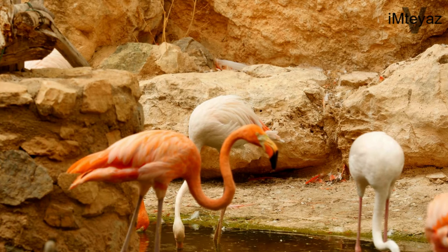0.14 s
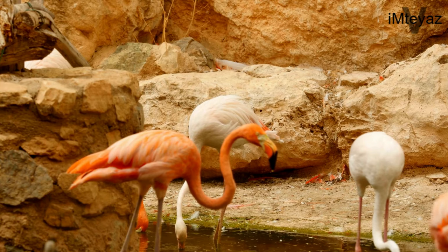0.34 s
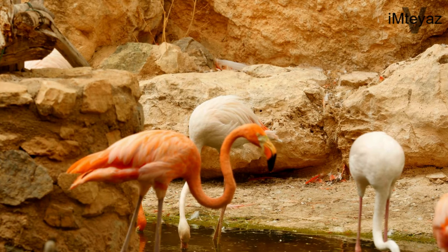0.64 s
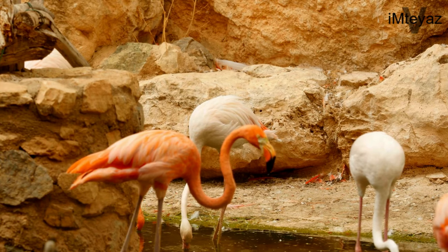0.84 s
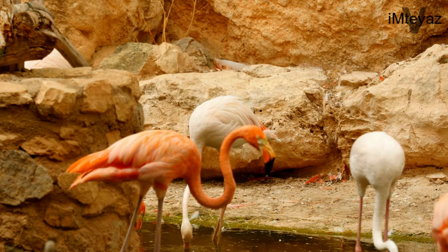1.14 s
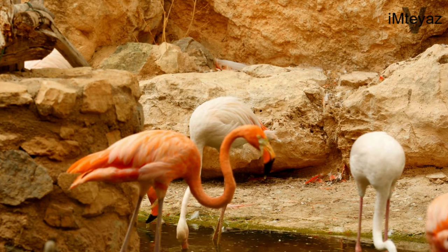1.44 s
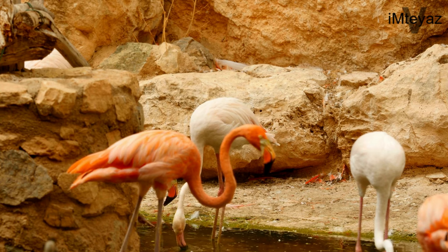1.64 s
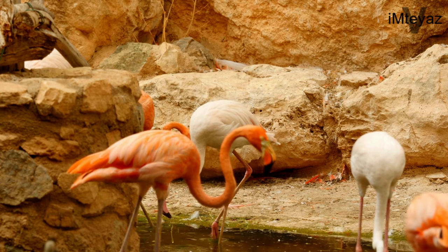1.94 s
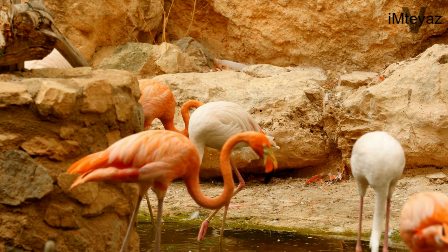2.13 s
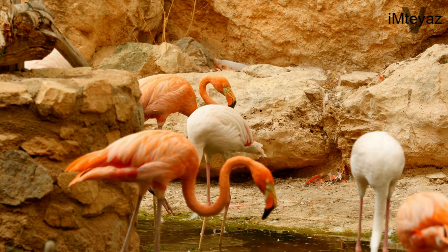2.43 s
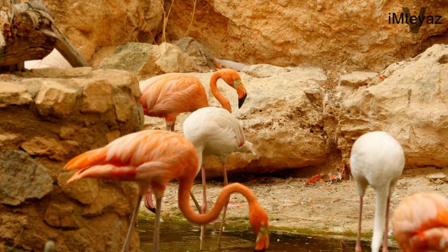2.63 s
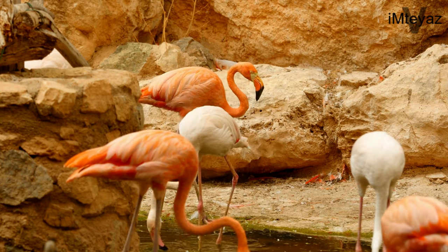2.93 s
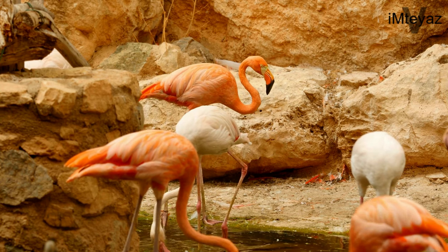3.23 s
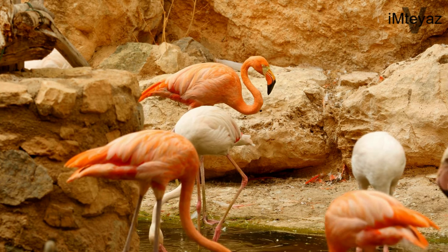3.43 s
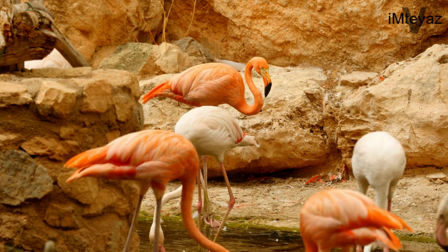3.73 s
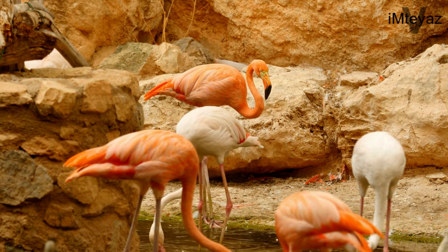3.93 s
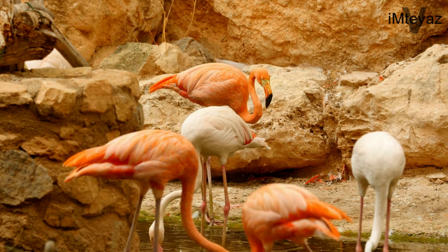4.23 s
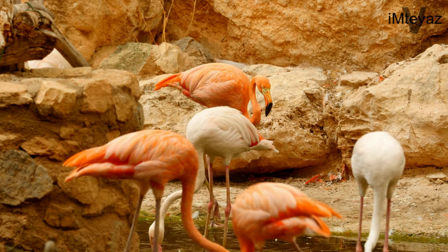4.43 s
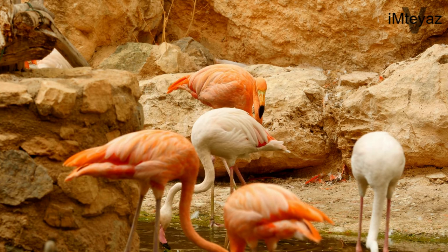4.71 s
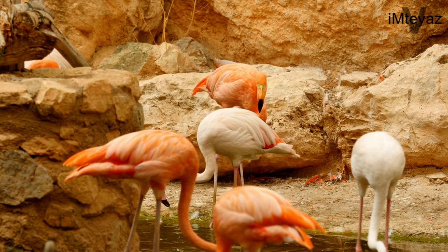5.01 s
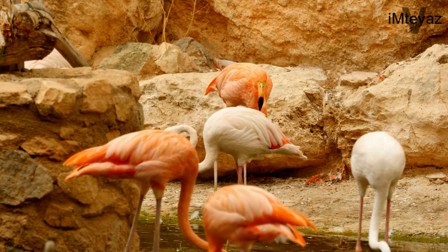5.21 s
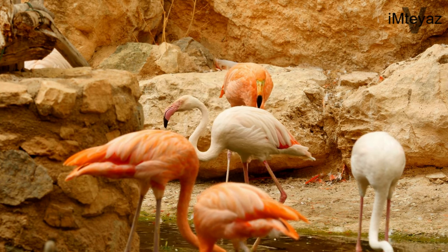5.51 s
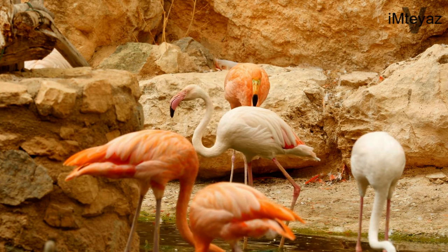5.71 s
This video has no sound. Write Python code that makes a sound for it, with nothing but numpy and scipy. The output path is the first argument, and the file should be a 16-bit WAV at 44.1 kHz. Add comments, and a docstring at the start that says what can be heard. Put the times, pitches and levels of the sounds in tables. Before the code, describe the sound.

Outdoors in a rocky pool enclosure, a stereo microphone hears open air, a faint steady whine above 5 kHz and a far flock gabbling, most active in the first 0.8 seconds. A weak honk at the left opens the scene; at about 0.4 seconds a thin, raspy squeak on the left sags in pitch. A clearer honk follows at 0.85, then from 1.16 a close flamingo, now central, honks every quarter second or so: tiny, nasal, buzzing bursts with sharp edges, each echoing briefly from the rocks. Soft low grunts answer on the right between 2.1 and 3.0. After a longer gap, a lower, cleaner honk lands at 3.8; from 4.1 to the end the honks are rougher, and from about 4.35 hissier. Faint small-bird chirps whistle near 3.5, 4.5, 4.8 and 5.6, while low rumble swells unevenly, strongest around 2.5 and 4.8.

```python
"""A flamingo honks about four times a second close to the microphone, in a rock-walled zoo pool.
Two syrinx membranes pulse at different pitches into windpipe resonances, so its short calls rasp.
Resonant pulse trains also grunt to the right; a noise rasp and a falling tone squeak to the left.
Gliding sines chirp as a small bird; shaped noise gives the far flock, open air, low rumble and
thin high whine. Filtered-noise tails and discrete reflections return the calls from the rocks."""
import sys
import numpy as np
from scipy import signal
from scipy.fft import rfft, irfft
from scipy.io import wavfile
from scipy.ndimage import uniform_filter1d, map_coordinates

SR = 44100
rng = np.random.default_rng(int(sys.argv[2]) if len(sys.argv) > 2 else 0)


def digitize_waveform(pressure):
    """Quantize a signal to 16-bit integers and store it at the path in sys.argv[1].

    Rows of a 2-D input are taken as channels; values are limited to [-1, 1].
    """
    field = np.atleast_2d(pressure).T
    bounded = np.clip(field, -1, 1)
    quanta = np.round(bounded * 32767).astype(np.int16)
    wavfile.write(sys.argv[1], SR, quanta)


N = 258426
TIME = np.arange(N) / SR

# honks of the near bird: start_s, gain_db, pitch_hz, rise_s, roughness (0-1), beak_opening (0-1)
HONKS = [ (.049, -24.5, 721.6, 0.0029, 0.31, 0.061), (0.849, -15.7, 660, 0.0046, .22, .35),
         (1.163, -14.2, 741, .0065, .55, 0.24), (1.4383, -14.6, 700, .004, .5, .15),
         (1.705, -14.5, 691.6, 0.0045, 0.46, 0.043), (1.9621, -14.6, 682.4, .005, 0.79, .5),
         (2.2333, -16, 660.5, 0.0086, 0.72, .8), (2.5027, -16, 703, 0.01, 0.64, 0.52),
         (2.779, -18.5, 692, 0.011, 0.53, 0.27), (3.058, -16.5, 693, 0.0076, 0.68, 0.47),
         (3.3552, -18.5, 692, 0.0073, 0.59, .35), (3.8245, -16, 462, 0.0033, 0.16, 0.65),
         (4.079, -16, 692, 0.0076, .8, 0.5), (4.3517, -15, 679, 0.0042, 0.79, 0.5),
         (4.628, -16.5, 689, .005, 0.85, 0.24), (4.916, -17.5, 671.4, 0.0021, 0.83, 0.74),
         (5.1759, -16.5, 677.4, 0.0017, 0.84, 0.84), (5.453, -17, 658, .0035, 0.8, 0.35),
         (5.7288, -17, 659, 0.0046, 0.83, 0.67)]
# reverberant bands of the enclosure: centre_hz, level_db, t60_s
RING_BANDS = [(500, -7.5, 0.97), (1200, -19.5, 0.39), (2170, -12, 0.73), (4470, -11, 0.52),
              (7500, -5.5, 0.28), (13500, -38, 0.12)]


def undb(db):
    """Decibels to amplitude ratio: 20 dB for each factor of ten."""
    return 10 ** (np.asarray(db) / 20)


def unit(x):
    """Normalisation by root mean square, so that levels can be set in decibels."""
    return x / np.sqrt(np.mean(x ** 2) + 1e-18)


def pan(x, left_minus_right_db):
    """Intensity stereo: the level difference between the channels places a sound."""
    gains = undb(np.array([[left_minus_right_db], [-left_minus_right_db]]) / 2)
    return x * unit(gains)


def add(out, x, start_s):
    """Superposition: the pressures of x and out sum from start_s on."""
    i = int(start_s * SR)
    out[:, i:i + x.shape[1]] += x[:, :N - i]


def resonate(x, hz, width_hz):
    """A steep-sided band-pass resonance with its output at rms 1."""
    low = np.sqrt(hz ** 2 + width_hz ** 2 / 4) - width_hz / 2
    high = min(low + width_hz, SR / 2 - 100)
    band = signal.butter(2, [low, high], "band", fs=SR, output="sos")
    return unit(signal.sosfilt(band, x))


def body(x, modes):
    """Parallel modes: one source excites every resonance, and their sum is scaled to rms 1."""
    return unit(sum(undb(db) * resonate(x, hz, width_hz) for hz, width_hz, db in modes))


def colour(x, points):
    """Spectral weighting by (hz, db) points, interpolated along log frequency."""
    hz, db = np.transpose(points)
    f = np.fft.rfftfreq(x.shape[-1], 1 / SR) + 1  # the added 1 Hz avoids log(0)
    gain = undb(np.interp(np.log(f), np.log(hz), db))
    return irfft(rfft(x) * gain, x.shape[-1])


def walk(rate_hz):
    """Slow random fluctuation: held random steps, smoothed by a moving average, at rms 1."""
    k = int(SR / rate_hz)
    steps = np.repeat(rng.standard_normal(N // k + 1), k)
    return unit(uniform_filter1d(steps, k)[:N])


def wide_noise(side_db, size=N):
    """Mid-side stereo: independent sum and difference noises, side_db being side over mid."""
    mid, side = rng.standard_normal((2, size))
    return unit(mid + undb(side_db) * side * np.array([[1], [-1]]))


def surround_noise():
    """Diffuse-field noise: the channels are alike in the bass and differ more in the middle."""
    # stereo width of air and rumble: band_hz, side_minus_mid_db
    side_spectrum = [(60, -12), (140, -10), (280, -6.5), (520, -1), (1500, 2.5), (5300, -8.5), (12000, 4.5)]
    mid, side = rng.standard_normal((2, N))
    width = colour(side, side_spectrum) * np.array([[1], [-1]])
    # the total power of mid and side is levelled in each band
    levelling = [(hz, -10 * np.log10(1 + undb(db) ** 2)) for hz, db in side_spectrum]
    return colour(mid + width, levelling)


def effort(t, held_s, rise_s=0.0043, swell_db_per_s=800, fall_db_per_s=750):
    """Exponential growth and decay: straight ramps in decibels around a steady hold."""
    rising_db = swell_db_per_s * np.maximum(rise_s - t, 0)
    falling_db = fall_db_per_s * np.maximum(t - held_s, 0)
    return undb(-rising_db - falling_db)


def membrane(hz, jitter, shimmer_db):
    """Pulse excitation: each membrane closure is a sharp pulse, irregular in time and size."""
    n, at, out = np.arange(len(hz)), 4., np.zeros(len(hz))
    for late, size in rng.standard_normal((100, 2)):
        if at >= len(hz):
            break
        # a band-limited pulse may fall between samples
        out += undb(shimmer_db * size) * np.sinc(n - at) * (abs(n - at) < 8)
        at += SR / hz[int(at)] * np.exp(jitter * late)
    return out


def background(air_db=-40, whine_hz=5376, whine_width_hz=560, whine_db=-52.5):
    """Filtered noise: open air, an unevenly growing rumble and a narrow whine like far insects."""
    # relative spectrum of the open air: band_hz, density_db
    air_spectrum = [(18, -61), (30, -34), (131, -4), (245, 1), (336, 2.5), (760, -4), (1160, -3),
                    (1630, -9), (2230, -8), (3490, -12.5), (4780, -13.5), (5310, 0), (6380, -20),
                    (14800, -35.5), (16000, -50)]
    # course of the rumble, before 0.5 dB of gain and its flutter: time_s, level_db
    rumble_course = [(0, -74), (.55, -49.5), (1.7, -51), (2.55, -38.5), (3.65, -45), (4.8, -36),
                     (5.86, -39.5)]
    # resonances of the rumble: centre_hz, width_hz, level_db
    rumble_modes = [(167.8, 54, -7.5), (242.5, 27, -1.5), (295, 65, 1), (398, 73, -2.5), (762, 250, -5.5)]
    air = undb(air_db + .5 * walk(4.14)) * unit(colour(surround_noise(), air_spectrum))
    rumble_db = np.interp(TIME, *np.transpose(rumble_course)) + 0.5
    rumble_flutter_db = 2.0 * walk(15)
    rumble = undb(rumble_db + rumble_flutter_db) * body(surround_noise(), rumble_modes)
    whine = undb(whine_db) * resonate(wide_noise(-13), whine_hz, whine_width_hz)
    return air + rumble + whine


def flock(murmur_db=-44.5, swell_db_per_s=650, fade_db_per_s=77, flutter_db=2.5):
    """Incoherent addition: the powers of far calls and a steady gabble sum in a fluttering wash."""
    # calls of the far flock: peak_s, peak_db (before flutter)
    far_calls = [(.15, -32), (.37, -29.5), (.44, -28.5), (.6, -30.5), (.72, -34.5), (1.33, -37),
                 (2.12, -32), (2.62, -36), (2.92, -36.5), (3.58, -41), (3.92, -42)]
    # resonances of the flock: centre_hz, width_hz, level_db
    far_throat = [(1229, 390, 7.5), (2410, 640, 3.5), (3380, 300, -2), (4200, 1400, 0.5)]
    power = undb(murmur_db) ** 2
    for peak_s, db in far_calls:
        call = undb(db) * effort(TIME - peak_s, 0, 0, swell_db_per_s, fade_db_per_s)
        power = power + call ** 2
    flutter = undb(flutter_db * walk(35))
    return np.sqrt(power) * flutter * body(wide_noise(1.5), far_throat)


def split(x, hz):
    """Band splitting: overlapping linear weights give each reverberant band its share of x."""
    centres = np.transpose(RING_BANDS)[0]
    f = np.fft.rfftfreq(x.shape[-1], 1 / SR)
    return irfft(rfft(x) * np.interp(f, centres, centres == hz), x.shape[-1])


def enclosure(x, build_s=0.015, side_db=-4, scatter_db=-13, scatter_s=0.0033):
    """Convolution with a room response: near scatter, distinct reflections and a diffuse tail."""
    # reflections off ground and rocks: delay_s, level_db, left_minus_right_db
    reflections = [(.0042, -19, 20), (0.0129, -12.5, 0), (0.0198, -21.5, 28), (.029, -23.5, -25)]
    t = np.arange(SR) / SR
    noise = wide_noise(side_db, size=SR)
    # close scatter arrives from the sides and widens the call
    early = np.exp(-t / scatter_s)
    response = undb(scatter_db) * wide_noise(1.3, size=SR) * early / np.linalg.norm(early)
    # the highest bands of the tail die first
    for hz, db, t60_s in RING_BANDS:
        fade = undb(-60 * t / t60_s) * (1 - np.exp(-t / build_s))
        response += undb(db) * split(noise, hz) * fade / np.linalg.norm(fade)
    for delay_s, db, side in reflections:
        response[:, int(delay_s * SR)] += pan(undb(db), side)[:, 0]
    return signal.fftconvolve(x.mean(axis=0)[None], response, axes=1)[:, :N]


def small_bird(length_s=0.064, fall=0.04, waver=.012):
    """Frequency modulation: thin whistles are single sines that fall slightly and waver."""
    # chirps of a small, distant bird: start_s, peak_db, starting_pitch_hz (before waver)
    chirps = [(3.5, -47, 3880), (3.75, -60, 4220), (4.53, -42, 3960), (4.805, -45, 4240), (5.61, -48, 3950),
              (5.661, -42, 3980)]
    out, u = np.zeros((2, N)), np.linspace(0, 1, int(length_s * SR))
    for start_s, db, hz in chirps:
        pitch = hz * (1 - fall * u + waver * walk(200)[:len(u)])
        whistle = np.sin(np.pi * u) * np.sin(2 * np.pi * np.cumsum(pitch) / SR)
        add(out, pan(undb(db) * whistle, 0), start_s)
    return out


def squeak(start_s=.41, pitch_hz=1482, sag_start_s=.056, sag_hz_per_s=5300, tone_db=-10, rasp_db=-22.5):
    """Amplitude modulation of noise at the pitch of a nearly pure, falling tone makes its rasp."""
    # resonances of the squeaking beak: centre_hz, width_hz, level_db
    squeak_beak = [(597, 130, -7.5), (1170, 720, 1), (1940, 520, -4), (3070, 840, -7.5), (4700, 590, -0.5),
                   (5860, 250, -2), (7570, 1000, -6.5), (11500, 2600, -18)]
    t = TIME - start_s
    # the pitch holds for a while, then sags
    hz = pitch_hz - sag_hz_per_s * np.clip(t - sag_start_s, 0, .04)
    phase = 2 * np.pi * np.cumsum(hz * (1 + 0.007 * walk(500))) / SR
    overtones = undb(-17) * (np.sin(2 * phase) / 4 + np.sin(4 * phase))
    tone = unit(np.sin(phase) + overtones)
    modulation = (1 + 0.55 * np.sin(phase)) * undb(3 * walk(250))  # pitch and 3 dB flutter
    rasp = body(rng.standard_normal(N) * modulation, squeak_beak)
    tone = undb(tone_db) * tone * effort(t, .077, .065, swell_db_per_s=750, fall_db_per_s=1900)
    rasp = undb(rasp_db) * rasp * effort(t, .077, .051, swell_db_per_s=420, fall_db_per_s=1200)
    return pan(tone, 10) + pan(rasp, 6)


def grunt(pitch_hz, held_s, jitter=0.079):
    """Source and filter: irregular low pulses ring the broad resonances of a throat."""
    # resonances of the grunting throat: centre_hz, width_hz, level_db
    grunt_throat = [(487, 210, -17), (960, 250, -2), (1450, 340, -3), (2370, 1900, -5)]
    t = np.arange(int(.08 * SR)) / SR
    pulses = membrane(np.full(len(t), pitch_hz), jitter, 2.4)
    return body(pulses * effort(t, held_s), grunt_throat)


def neighbours(lag_s=0.00021):
    """Interaural delay: soft grunts from the right reach the left microphone late."""
    # grunts of other birds: start_s, level_db, pitch_hz, held_s, left_minus_right_db
    grunts = [(2.069, -40, 382, 0.041, -11), (2.478, -32.5, 418.4, 0.064, -5),
              (2.752, -29.5, 520.6, 0.019, -10), (2.821, -35, 525, 0.015, -8), (3.028, -32, 539, 0.019, -6)]
    out = np.zeros((2, N))
    for start_s, db, pitch_hz, held_s, side in grunts:
        add(out, pan(undb(db) * grunt(pitch_hz, held_s), side), start_s)
    return np.array([np.roll(out[0], int(lag_s * SR)), out[1]])


def honk(pitch_hz, rise_s, held_s, rough, gape, tilt_db, hiss_db, pitch_drop=.3, glide_s=0.01706,
         second_ratio=0.81, second_share=0.7, jitter=.014, air=0.071, octave_db=-7.5,
         octave_held_s=0.023, chest_db=-20.3, chest_hz=525, neck_spread=0.012, sag=0.026):
    """Source and filter: a gliding and a lower, unsteady membrane excite windpipe resonances."""
    # windpipe and beak, before shifts of posture and emphasis:
    # centre_hz, width_hz, level_db, gain_with_beak_opening_db, gain_with_roughness_db
    throat = [ (1352, 255, -10, 1.5, -3), (2043, 224, -8, -11.5, -2), (2393, 242, -6.5, 5.5, 0),
              (3027, 287, -8, 0.5, 5.5), (3836, 400, -9.5, -3, 0.5), (4430, 370, -13, -5, 1),
              (5173, 466, -16, -2, 2), (6470, 720, -24, -2.5, 8)]
    # spectrum of the turbulent hiss: band_hz, level_db
    hiss_spectrum = [(5000, -17), (7000, -3.5), (9500, 1.5), (12000, -4.5), (16000, -23)]
    t = np.arange(int(.06 * SR)) / SR
    # a fully rough honk glides down by pitch_drop as a share of its pitch; clean ones stay level
    glide = 1 - np.exp(-(t / glide_s) ** 1.312)
    hz = pitch_hz * (1 - pitch_drop * rough ** 1.495 * glide)
    first = membrane(hz, jitter * np.sqrt(rough), 2.0)
    second = membrane(np.full(len(t), pitch_hz * second_ratio), jitter * 1.63, 3.2)
    # the second side joins in almost at once, more strongly in rough calls
    pulses = first + second_share * np.sqrt(rough) * second * np.minimum(t / 0.00028, 1)
    # each closure lets out a puff of turbulent air that decays within milliseconds
    puff_level = signal.lfilter([1], [1, -np.exp(-1 / (0.0024 * SR))], pulses)
    puffs = rng.standard_normal(len(t)) * puff_level
    push = effort(t, held_s, rise_s, swell_db_per_s=720, fall_db_per_s=680)
    source = (pulses + air * puffs) * push
    # the neck is held a little differently for each call
    centres, widths, dbs, open_db, rough_db = np.transpose(throat)
    centres = centres * (1 + neck_spread * rng.standard_normal(len(throat)))
    # beak, roughness and spectral tilt weight the resonances
    emphasis = open_db * (gape - .5) + rough_db * (rough - .5) + tilt_db * np.log2(centres / centres[2])
    voice = sum(undb(db) * resonate(source, f, width) for f, width, db in zip(centres, widths, dbs + emphasis))
    # reading ever more slowly, the whole voice sags as the call runs out of air
    read_speed = 1 + sag * np.clip(1 - t / 0.012, -1, 1) / 2
    voice = map_coordinates(voice, [np.cumsum(read_speed)], order=3)
    # a hard, rough call also wakes the lowest pipe resonance and a clean, gliding second harmonic
    chest = undb(chest_db) * resonate(source, chest_hz, 136)
    harmonic = np.sin(4 * np.pi * np.cumsum(hz) / SR) * effort(t, octave_held_s, rise_s)
    octave = undb(octave_db + emphasis[0]) * unit(harmonic)
    hiss = undb(hiss_db) * unit(colour(puffs * push, hiss_spectrum))
    return voice + rough * chest + rough ** 2 * octave + hiss


def near_bird(usual_db=-14.5, usual_rise_s=0.0062):
    """Effort and spectral tilt: louder honks are brighter, slowly starting ones duller."""
    # the bird walks in from the left: time_s, left_minus_right_db
    bird_pan = [(0, 17), (1.3, -0.5), (5.86, -0.1)]
    # hiss before the gain of each honk, strongest once the beak faces the microphone: time_s, level_db
    bird_hiss = [(.8, -51), (1.2, -37.5), (1.9, -27.5), (2.5, -36.5), (3.9, -37.5), (4.35, -23),
                 (5.86, -25.5)]
    out = np.zeros((2, N))
    for start_s, db, pitch_hz, rise_s, rough, gape in HONKS:
        side = np.interp(start_s, *np.transpose(bird_pan))
        hiss_db = np.interp(start_s, *np.transpose(bird_hiss))
        # a honk fades later if it starts slowly or is loud (0.0018 s per dB)
        held_s = 0.014 + 0.69 * rise_s + 0.0018 * (db - usual_db)
        # dB per octave: 0.48 for each dB over the usual level, -328 for each second of extra rise
        tilt_db = 0.48 * (db - usual_db) - 328 * (rise_s - usual_rise_s)
        call = honk(pitch_hz, rise_s, held_s, np.clip(rough, 0, 1), gape, tilt_db, hiss_db)
        add(out, pan(undb(db) * call, side), start_s)
    return out


def scene(path_count=4, squeak_echo_db=-5):
    """Superposition of direct sound, reverberation and surroundings."""
    birds = near_bird() + neighbours() + small_bird()
    squeal = squeak()
    to_rocks = birds + undb(squeak_echo_db) * squeal
    # the birds turn their heads, so successive honks take different paths among the rocks
    path = np.searchsorted(np.transpose(HONKS)[0] - .001, TIME) % path_count
    echoes = sum(enclosure(to_rocks * (path == k)) for k in range(path_count))
    return birds + squeal + echoes + flock() + background()


def record(dry, top_hz=16000):
    """Saturation and band limiting: the recorder clips at full scale, then cuts the top."""
    low_pass = signal.ellip(8, .2, 70, top_hz, fs=SR, output="sos")
    return signal.sosfilt(low_pass, np.clip(dry, -1, 1))


dry = scene()
out = record(dry)
digitize_waveform(out)
```